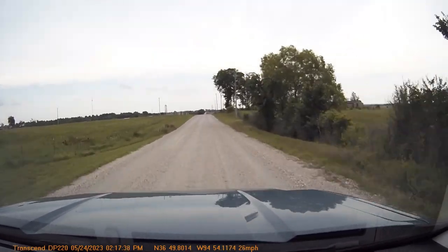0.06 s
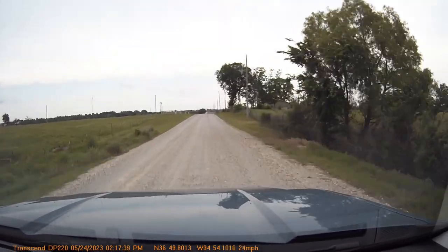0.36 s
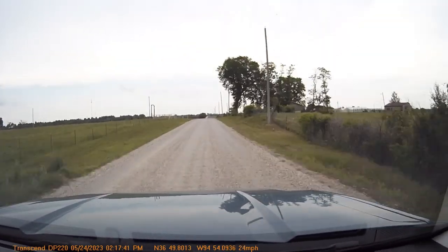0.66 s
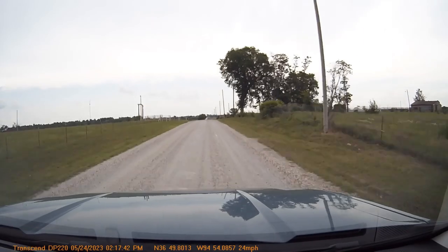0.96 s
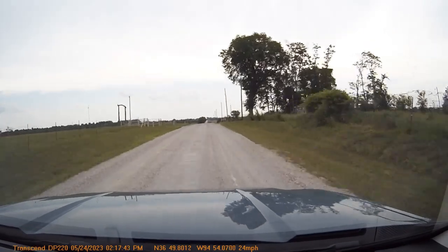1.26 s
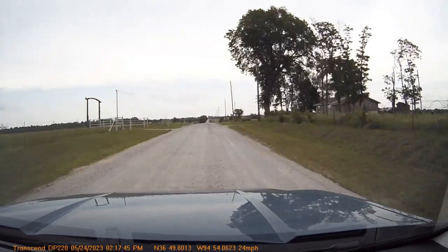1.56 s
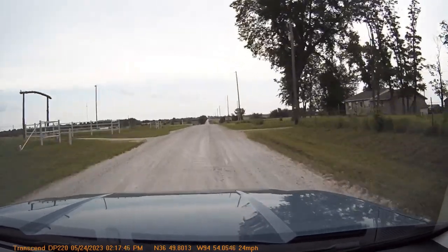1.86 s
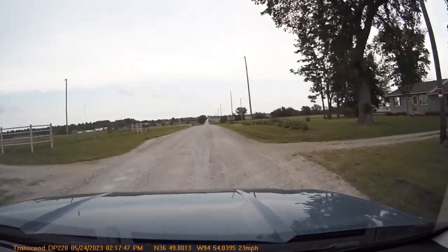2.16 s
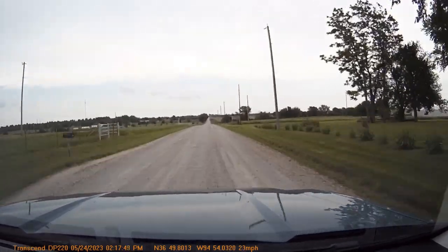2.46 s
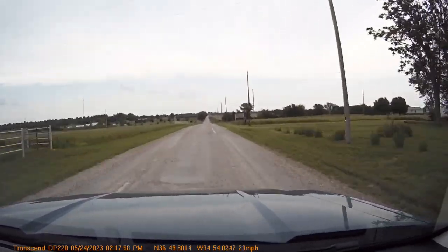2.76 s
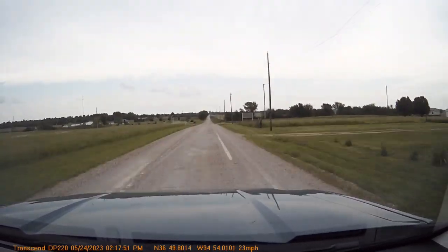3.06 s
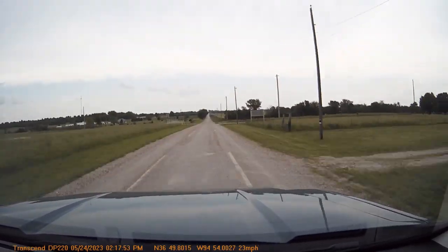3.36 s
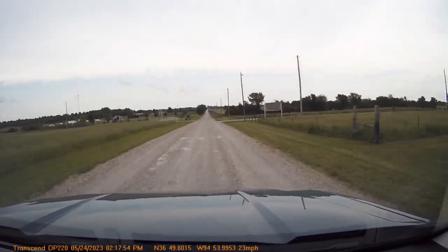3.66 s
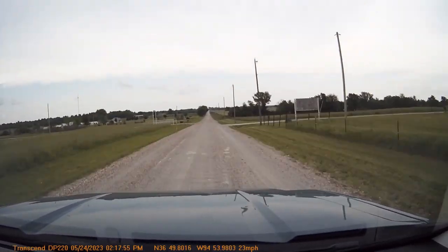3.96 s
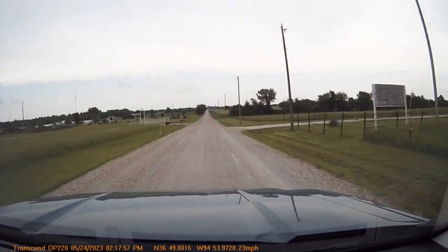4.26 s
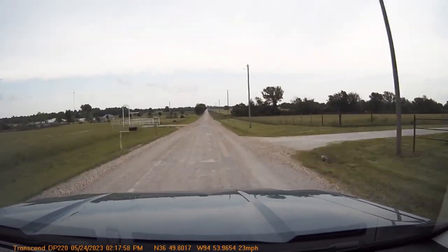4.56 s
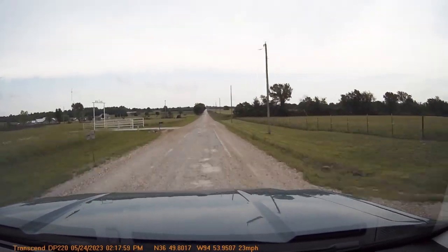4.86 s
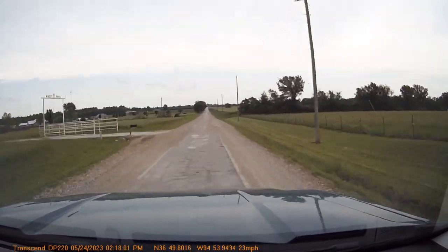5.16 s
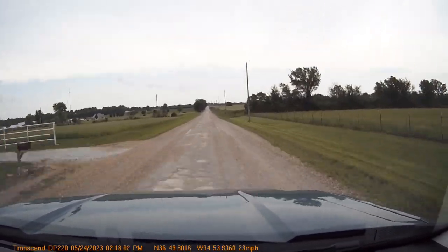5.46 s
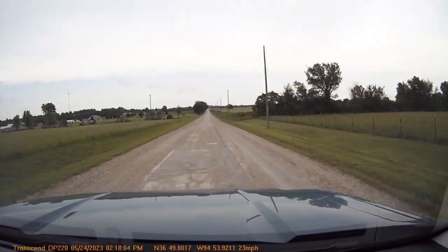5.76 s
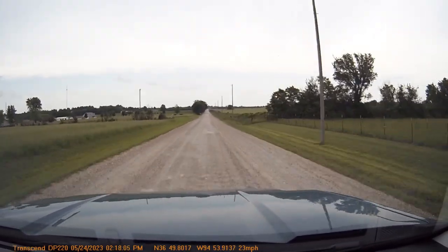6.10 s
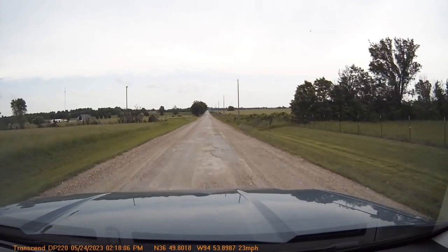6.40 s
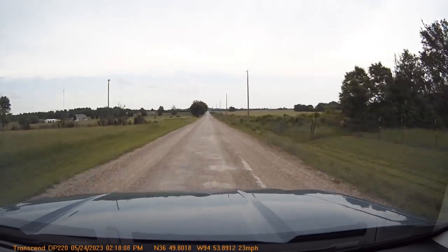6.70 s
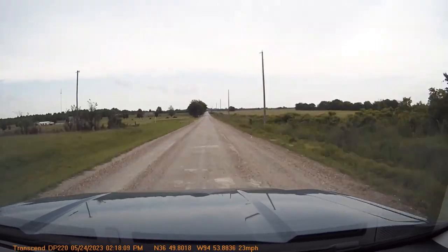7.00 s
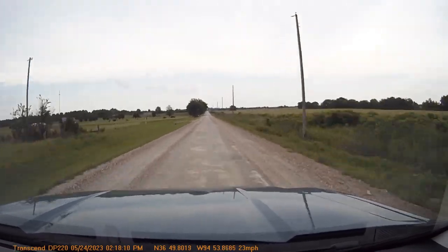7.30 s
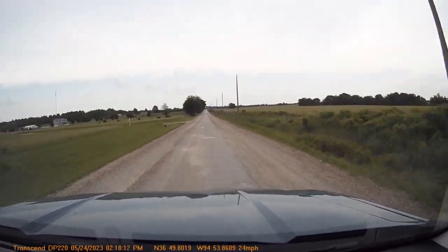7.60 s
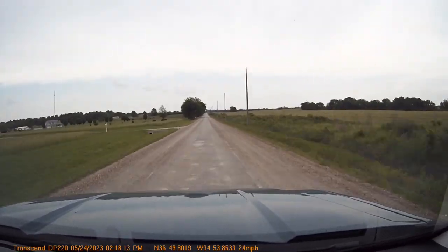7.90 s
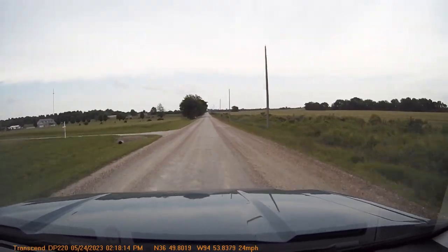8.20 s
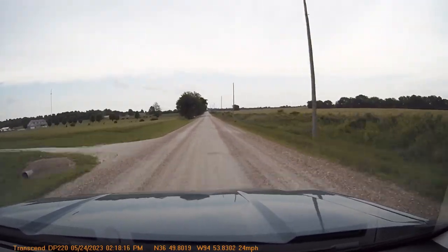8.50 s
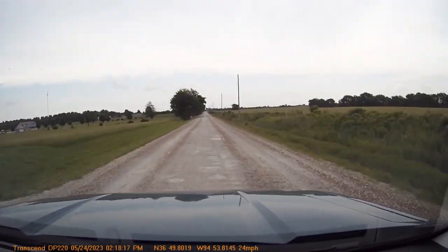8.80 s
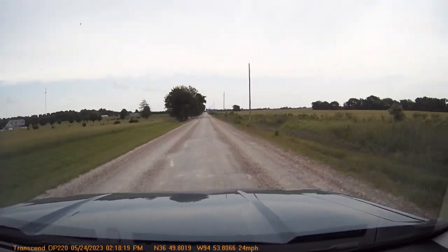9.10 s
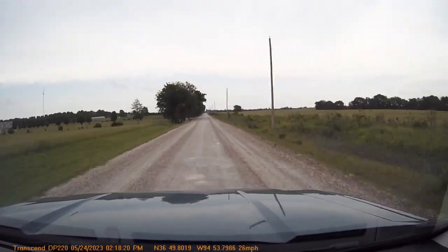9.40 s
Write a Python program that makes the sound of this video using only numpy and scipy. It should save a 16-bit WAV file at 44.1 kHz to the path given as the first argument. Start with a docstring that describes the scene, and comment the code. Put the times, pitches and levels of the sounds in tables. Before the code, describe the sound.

Close up inside a slowly moving car, the cab booms and rumbles as the tyres roll over gravel. Loose plastic on the windscreen rattles in quick bursts with a faint, fluttering rasp and a light clatter of trim. The rattling eases briefly after the opening, then returns and is busiest past the middle. Stones occasionally tick on the bodywork, and late on a heavy bump brings a sharp, dry click and a fainter one.

```python
"""Tyre rumble and a dull gravel roar fill the cab of a slowly rolling car. The shaking rocks a loose plastic
mount on the windscreen about 32 times a second: it chafes as it swings and knocks against its stop on rough
ground, setting the trim clattering. A few stones tick on the body, and a sharp click and a faint one sound near
7.5 s."""
import sys
import numpy as np
from scipy import signal
from scipy.fft import rfft, irfft
from scipy.io import wavfile
from scipy.ndimage import uniform_filter1d

SR = 44100
rng = np.random.default_rng(int(sys.argv[2]) if len(sys.argv) > 2 else 0)


def store_wav(level_fs):
    """Save 16-bit WAV to argv[1]."""
    pcm = np.round(np.clip(np.atleast_2d(level_fs), -1, 1) * 32767)
    wavfile.write(sys.argv[1], SR, pcm.T.astype(np.int16))


N = 425555
TIME = np.arange(N) / SR
BINS = np.fft.rfftfreq(N, 1 / SR)
SWING_HZ = 32.3  # the mount's natural rocking rate

# tone curves, each with columns: frequency_hz, gain_db
HEAVE_TONE = [(12, -26.5), (24, -12), (40, 7), (51, 0.5), (64, 7), (80, 6), (105, -11), (200, -65)]  # the car body's deep heave
BOOM_TONE = [(45, -22.5), (80, -3), (98, -2.5), (118, 1.5), (131, -3.5), (141, 3.5), (151, -3.5),
             (170, -11), (208, -10), (228, -15), (255, -14), (310, -33), (500, -82)]  # the booming cab
ROAR_TONE = [(150, -32.5), (300, -2.5), (430, -0.5), (560, -7), (690, -5.5), (900, -11), (1200, -20.5),
             (1600, -33.5), (2250, -32), (3200, -40), (6000, -39), (15000, -53.5)]  # tread on gravel
MOUNT_TONE = [(200, -38.5), (420, -14), (560, 5), (660, -6), (825, 9.5), (950, -1), (1080, 2), (1200, -0.5),
              (1340, -13.5), (1800, -15.5), (3200, -10), (3550, -19.5), (3850, -5.5), (5200, -43.5),
              (9000, -68)]  # the struck mount
TRIM_TONE = [(700, -48.5), (1250, -1), (1480, 7.5), (1700, -4.5), (1900, -3.5), (2400, -0.5), (2650, -9),
             (3300, -8), (4300, -15), (6500, -39.5)]  # the ringing trim
CHAFE_TONE = [(1200, -27), (1850, -9), (2280, 0), (2600, -6), (3900, -4.5), (4400, -5.5), (5650, 10),
              (6300, -1), (7400, -7), (9400, -3.5), (11300, -7.5), (12800, -17), (13900, -13.5),
              (15600, -12)]  # plastic rubbing on plastic
# what the road stirs up: time_s, heave_db, boom_db, roar_db, chafe_db
ROAD_LEVELS = [(0, -41, -22, -42, -53), (.2, -34, -19, -38.5, -47.5), (.45, -23.5, -20, -37, -49),
               (.95, -24, -19.5, -32.5, -47), (1.1, -29.5, -18.5, -38, -51.5), (1.4, -23, -20, -41, -51),
               (1.9, -31.5, -22.5, -43.5, -54), (2.6, -30.5, -23, -43, -53), (4.7, -31.5, -22, -43.5, -54),
               (5.2, -29.5, -20, -40.5, -50.5), (6.1, -31, -23.5, -45.5, -55.5),
               (7.1, -27, -23.5, -40, -52), (7.5, -21, -19, -39, -54), (8.1, -30, -18, -40, -50.5),
               (8.3, -33, -27.5, -43, -58), (8.42, -26, -22.5, -44, -58), (9.1, -36, -23, -43, -53),
               (9.65, -20, -21.5, -41, -48.5)]
# bumps and stony patches: centre_s, length_s, added_heave_db, added_boom_db, added_roar_db
ROAD_BUMPS = [(0.668, 0.08, -5.5, 4, -1.5), (1.227, .12, 3, 2, 5), (2.765, .16, -2, 4, 1),
              (3.005, 0.15, 1, 1.5, 2), (3.303, 0.24, 1, 5, 0.5), (3.691, 0.14, 6, 2.5, 8),
              (4.527, 0.17, 0, 1, 3), (4.959, 0.081, 6, -3.5, -4), (5.34, 0.15, -5, 3, -3),
              (5.466, 0.15, 0, 0, 4), (5.814, 0.29, 1, 3.5, 10), (6.0, 0.15, 8.5, -1.5, 3),
              (6.287, 0.13, 9, 5, 5), (6.598, 0.14, 4, 6, 6), (6.805, 0.097, 7.5, 7.5, 7.5),
              (7.444, 0.13, 1, 7.5, 6), (7.867, 0.076, -0.5, 3.5, 3), (8.153, 0.088, 8.5, 3, 6.5),
              (8.758, 0.08, 5, 2, 6), (9.544, 0.084, -3.5, 2, 0)]
# bouts in which the mount reaches its stop: start_s, accent_s, end_s, knock_db, clack_db
RATTLE_BOUTS = [(.018, .018, .018, -19.5, -36), (.235, .426, .46, -14.5, -32), (.527, 0.5, .61, -15.5, -28),
                (.69, .931, 1.08, -13, -23.5), (1.188, 1.311, 1.4, -15.5, -30),
                (2.94, 2.973, 3.0, -21.5, -48), (3.415, 3.415, 3.5, -17, -52),
                (3.635, 3.665, 3.87, -13.5, -25.5), (4.47, 4.505, 4.54, -17, -32.5),
                (4.595, 4.685, 4.84, -15.5, -38.5), (5.351, 5.448, 5.53, -16, -32),
                (5.675, 5.86, 5.99, -15, -30), (6.085, 6.148, 6.18, -14.5, -42),
                (6.227, 6.262, 6.3, -15.5, -32), (6.56, 6.592, 6.74, -14, -32.5),
                (6.79, 6.916, 7.07, -15, -24.5), (7.434, 7.434, 7.434, -21, -42),
                (7.636, 7.636, 7.665, -19, -43), (7.939, 8.0, 8.0, -19.5, -42), (8.41, 8.44, 8.5, -15, -36),
                (8.762, 8.762, 8.762, -26.5, -50), (8.987, 9.049, 9.11, -19, -45),
                (9.46, 9.523, 9.62, -14.5, -33)]
# the contacts within one knock: delay_s, level_db, contact_s
KNOCK_CONTACTS = [(-.0025, -9, .00003), (-.0012, -13.5, 0.000015), (.0004, 4.5, .00015),
                  (.0015, -15.5, 0.000031)]
# the two rasps of a swing, out and back: length_s, level_db
CHAFE_STROKES = [(.008, 0), (.0055, -3.5)]
# the mount sticks and its chafing drops out: centre_s, length_s, depth_db
MOUNT_STICKS = [(0.1, .12, 1.5), (1.667, 0.19, 3.5), (1.776, 0.086, 27), (1.96, 0.13, 7.5), (2.52, 0.1, 23),
                (3.236, .1, 21), (3.361, 0.04, 18), (4.065, 0.19, 28), (4.343, 0.049, 18),
                (6.402, 0.12, 31), (7.166, 0.034, 12), (7.284, 0.045, 23), (7.514, 0.069, 3),
                (7.777, .03, 13), (8.576, 0.17, 8)]
# stones flung at the body: start_s, peak_db, pitch_hz
STONE_HITS = [(0.1903, -26, 1850), (2.1774, -44, 1842), (4.3533, -40, 1625), (5.1768, -33, 1550),
              (6.6188, -26, 2360), (8.383, -43, 1900)]
# sharp clicks: time_s, peak_db, settle_s
SHARP_CLICKS = [(7.4542, -11.5, 0.0015), (7.611, -27, 0.00039)]
# the microphone housing's hollows and one high peak: centre_hz, width_hz, gain_db
HOUSING_BANDS = [(998, 88, -35.5), (1662, 48, -27), (2670, 37, -21.5), (3015, 340, -29),
                 (5070, 1200, -34.5), (7990, 1460, -32.5), (10100, 310, -12), (11000, 470, -21),
                 (11830, 1530, -21), (13800, 670, 8)]


def tyres(heave_db, boom_db, roar_db, lumpy_db=2):
    """The body heaves and the cab booms with the bumps; the roar swells as stones pass under the tread."""
    heave = steady_rumble(HEAVE_TONE) * amp(heave_db + 1.5)
    boom = steady_rumble(BOOM_TONE) * amp(boom_db)
    gravel = rng.standard_normal(N) * amp(lumpy_db * drift(hz=60))
    roar = coloured(gravel, ROAR_TONE) * amp(roar_db + 2)
    return heave + boom + roar


def road():
    """The road rides four faders, in dB: heave, boom, roar and chafe, swelling or dipping at each bump."""
    times, *levels = np.transpose(ROAD_LEVELS)
    faders = np.array([np.interp(TIME, times, level) for level in levels])
    for centre_s, length_s, heave_db, boom_db, roar_db in ROAD_BUMPS:
        swell = np.exp(-(2 * (TIME - centre_s) / length_s) ** 2)
        chafe_db = .63 * roar_db
        faders += np.outer([heave_db, boom_db, roar_db, chafe_db], swell)
    return faders


def rattle_hits(roar_db, graze_db=3, build_s=.018, fade_db=4.5, accent_db=1.97, jitter_s=.0007):
    """One hit a swing, building and dying away in each bout: rows of time_s, knock_db, clack_db."""
    hits = []
    for start_s, accent_s, end_s, knock_db, clack_db in RATTLE_BOUTS:
        before = round((accent_s - start_s) * SWING_HZ)
        after = round((end_s - accent_s) * SWING_HZ)
        swings = np.arange(-before, after + 1)
        late, harder, brighter = rng.standard_normal((20, 3))[swings].T
        times = accent_s + swings / SWING_HZ
        building = graze_db * np.exp((times[0] - times) / build_s)
        dying = fade_db * (swings / (after + .5)) ** 2
        softer_db = np.where(swings < 0, building, dying) + accent_db * (swings != 0)
        # the trim clacks most on the stoniest ground
        ground_db = np.interp(times, TIME, roar_db)
        duller_db = .98 * softer_db + (ground_db.max() - ground_db)
        hits += zip(times + jitter_s * late,
                    knock_db - softer_db + harder,
                    clack_db - duller_db + 2.5 * brighter)
    return hits


def mount_knocks(hits, slack_s=.00017, tail_t60_s=.1, tail_top_hz=2000, rebound_s=.019, rebound_db=-13.5):
    """The mount grazes its stop, lands, chatters, and bumps the far side softly half a swing later."""
    size, lead_s = 4096, 256 / SR
    t, hz = np.arange(size) / SR, np.fft.rfftfreq(size, 1 / SR)
    body, mix = resonance(MOUNT_TONE), np.zeros(N)
    delay_s, contact_db, contact_s = np.transpose(KNOCK_CONTACTS)[:, :, None]
    dulling = np.exp(-2 * (np.pi * hz * contact_s) ** 2)  # a longer contact gives a duller blow
    for time_s, knock_db, _ in hits:
        slip, harder = rng.standard_normal((2, len(KNOCK_CONTACTS), 1))
        late, stronger = rng.standard_normal(2)
        blows = amp(contact_db + 1.6 * harder) * dulling
        landing_s = lead_s + delay_s + slack_s * slip
        force = (blows * np.exp(-2j * np.pi * hz * landing_s)).sum(0)
        # glass and dashboard scatter a short, dull tail
        tails = rng.standard_normal((2, size)) * amp(-60 * t / tail_t60_s)
        tails *= amp(-7) / np.linalg.norm(tails[0])
        near_tail, far_tail = rfft(tails) / np.hypot(1, hz / tail_top_hz)
        knock = irfft(force * body * (1 + near_tail))
        rebound = irfft(force * body * (.5 + 2 * far_tail)) * amp(rebound_db + 5.3 * stronger)
        gain = amp(knock_db - 1) / abs(knock).max()
        add(mix, time_s - lead_s, gain * knock)
        add(mix, time_s - lead_s + rebound_s + .001756 * late, gain * rebound)
    return mix


def trim_clatter(hits, lag_s=.0006, chatter_db=-9, chatter_s=.029, scatter_db=4, count=7):
    """Knocks jolt the trim around the mount: one bright clack, then a scatter of small ones."""
    taps = np.zeros(N)
    for time_s, _, clack_db in hits:
        add(taps, time_s + lag_s, [amp(clack_db)])
        for when, push in zip(rng.random(count), rng.standard_normal(count)):
            tap_db = clack_db + chatter_db + scatter_db * (abs(push) - .5)
            add(taps, time_s + when * chatter_s, [np.sign(push) * amp(tap_db)])
    ring = irfft(resonance(TRIM_TONE))
    return signal.oaconvolve(taps, ring / abs(ring).max())[:N]


def mount_chafing(chafe_db, attack_s=.0004, scatter_db=1.3, grain_db=3, wander_db=1.5):
    """Plastic slides on plastic twice a swing: a long rasp out, a shorter one back."""
    turns = SWING_HZ * TIME + .1 + .06 * drift(hz=1.5) + .02 * drift(hz=15)  # the pace wavers a little
    t = np.arange(900) / SR
    attack = 1 - np.exp(-t / attack_s)
    rub = np.full(N, amp(-26))  # a faint hiss between strokes
    for lag_turns, (length_s, level_db) in zip((0, .47), CHAFE_STROKES):
        starts = np.flatnonzero(np.diff(np.floor(turns - lag_turns)) > 0)
        for start, (longer, harder) in zip(starts, rng.standard_normal((500, 2))):
            travel = t / (length_s * np.exp(.22 * longer))
            stroke = attack * np.exp(-travel ** 5 - .5 * travel)
            add(rub, start / SR, amp(level_db + scatter_db * harder) * stroke)
    grain = amp(grain_db * drift(hz=503)) * rng.standard_normal(N)
    rasp = coloured(rub * grain, CHAFE_TONE)
    return rasp * amp(chafe_db + 1 - sticking_db() + wander_db * drift(hz=12))


def sticking_db():
    """How far the chafing ducks while the mount sticks; it drops and returns abruptly."""
    return sum(depth_db * np.exp(-(2 * (TIME - centre_s) / length_s) ** 4)
               for centre_s, length_s, depth_db in MOUNT_STICKS)


def stone_ticks(attack_s=.00022, t60_s=.0099, pitch_spread=.17):
    """Each stone rings a small patch of the body for a few milliseconds."""
    t, mix = np.arange(2000) / SR, np.zeros(N)
    envelope = (1 - np.exp(-t / attack_s)) * amp(-60 * t / t60_s)
    for start_s, peak_db, pitch_hz in STONE_HITS:
        partials_hz = pitch_hz * np.exp(pitch_spread * rng.standard_normal((8, 1)))
        phases = rng.random(partials_hz.shape)
        tick = np.sin(2 * np.pi * (partials_hz * t + phases)).sum(0) * envelope
        add(mix, start_s, amp(peak_db) * tick / abs(tick).max())
    return mix


def clicks():
    """Sharp, dry clicks: the wave dips, snaps upward and settles again."""
    return sum(amp(peak_db) * np.sign(TIME - time_s) * np.exp(-abs(TIME - time_s) / settle_s)
               for time_s, peak_db, settle_s in SHARP_CLICKS)


def steady_rumble(tone):
    """A bed of noise with this tone, its slow swells levelled."""
    noise = coloured(rng.standard_normal(N), tone)
    return noise / np.sqrt(uniform_filter1d(noise ** 2, size=6000))


def resonance(tone, size=4096):
    """Frequency response of a struck body; minimum phase, so it rings only after the blow."""
    log_gain = np.log(tone_gain(tone, abs(np.fft.fftfreq(size, 1 / SR))))
    return np.exp(np.conj(signal.hilbert(log_gain)))[:size // 2 + 1]


def tone_gain(tone, hz):
    """Gain of a tone curve at hz, rolling off 20 dB an octave above its last point."""
    points_hz, gain_db = np.transpose(tone)
    octaves_above = np.log2(np.maximum(hz / points_hz[-1], 1))
    return amp(np.interp(np.log(hz + 1), np.log(points_hz + 1), gain_db) - 20 * octaves_above)


def coloured(sound, tone):
    """Equalises a sound with a tone curve, at rms 1."""
    return unit_rms(irfft(rfft(sound) * tone_gain(tone, BINS), N))


def drift(hz):
    """Random wander at rms 1, rolled off above hz."""
    return unit_rms(irfft(rfft(rng.standard_normal(N)) * np.exp(-(BINS / hz) ** 2), N))


def unit_rms(sound):
    """Scales to rms 1."""
    return sound / np.sqrt(np.mean(sound ** 2) + 1e-20)


def amp(db):
    """Decibels to gain."""
    return 10 ** (np.asarray(db) / 20)


def add(mix, start_s, sound):
    """Lays a sound into the mix at start_s."""
    part = mix[max(round(start_s * SR), 0):][:len(sound)]
    part += sound[:len(part)]


def scene():
    """Tyres, rattling mount, trim and stones, all close by and in mono."""
    heave_db, boom_db, roar_db, chafe_db = road()
    hits = rattle_hits(roar_db)
    rolling = tyres(heave_db, boom_db, roar_db)
    rattle = mount_knocks(hits) + trim_clatter(hits)
    return (rolling + rattle + stone_ticks() + mount_chafing(chafe_db))[None]


def record(dry):
    """The microphone's housing hollows out bands; the clicks join after it; the top treble is cut."""
    housing = 1
    for centre_hz, width_hz, gain_db in HOUSING_BANDS:
        detuning = 2j * (BINS - centre_hz) / width_hz
        housing *= (amp(gain_db) + detuning) / (1 + detuning)
    heard = irfft(rfft(dry) * housing, N) + clicks()
    high_cut = signal.firwin(1023, cutoff=15850, window=("kaiser", 9), fs=SR)
    return signal.oaconvolve(heard, high_cut[None], "same")


dry = scene()
out = record(dry)
store_wav(out)
```